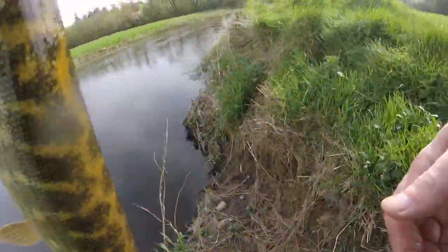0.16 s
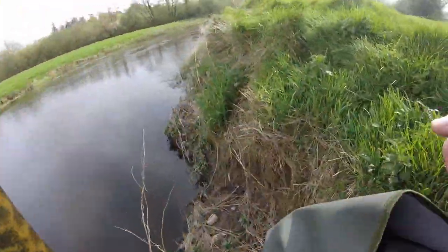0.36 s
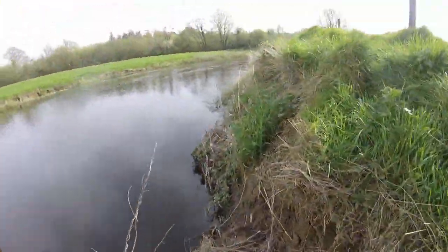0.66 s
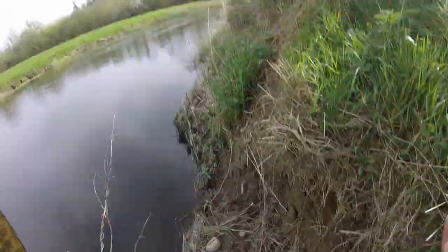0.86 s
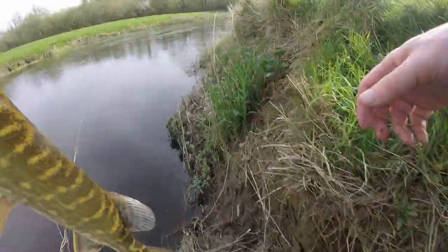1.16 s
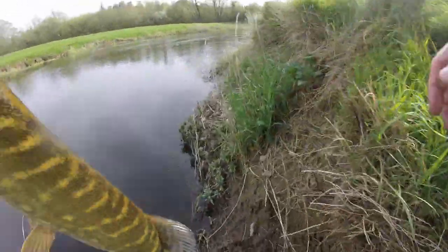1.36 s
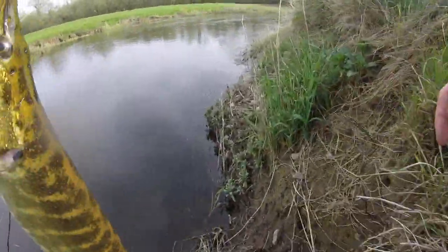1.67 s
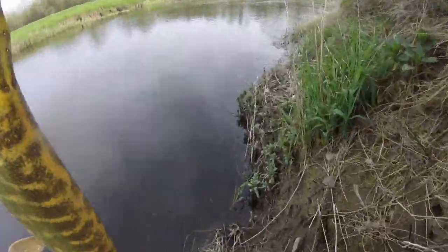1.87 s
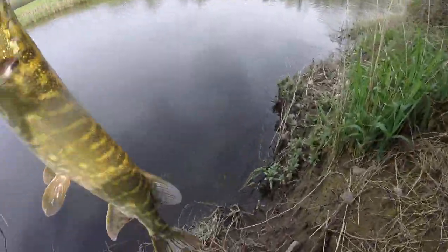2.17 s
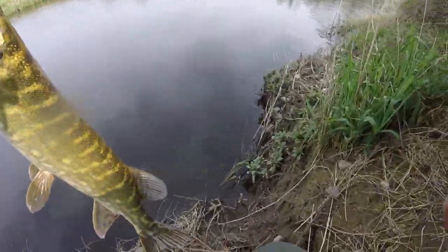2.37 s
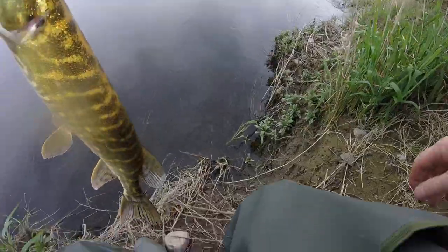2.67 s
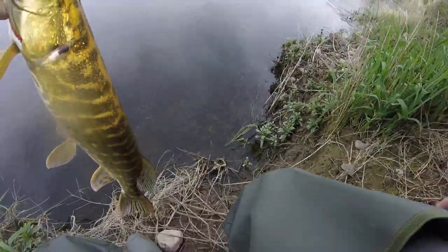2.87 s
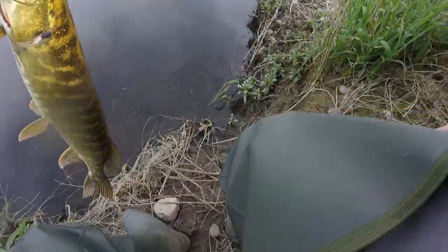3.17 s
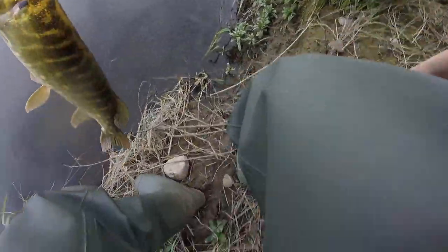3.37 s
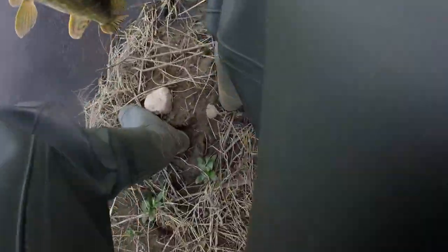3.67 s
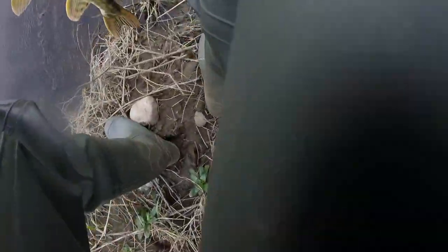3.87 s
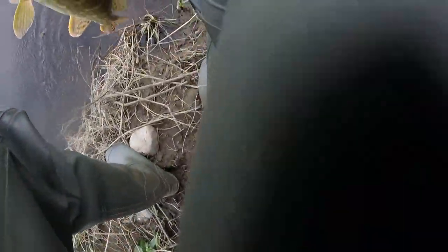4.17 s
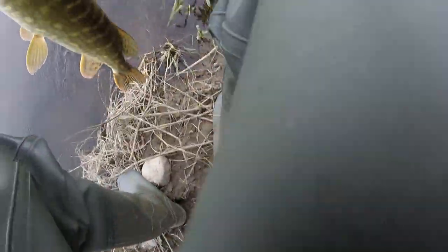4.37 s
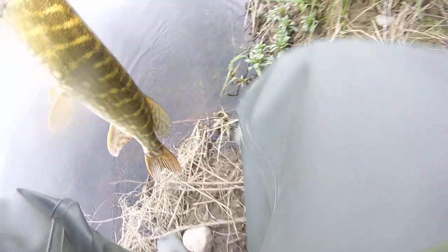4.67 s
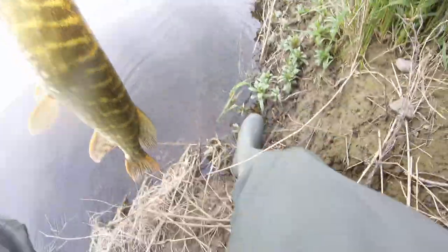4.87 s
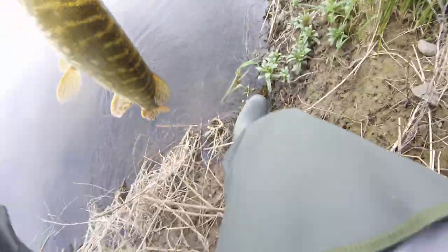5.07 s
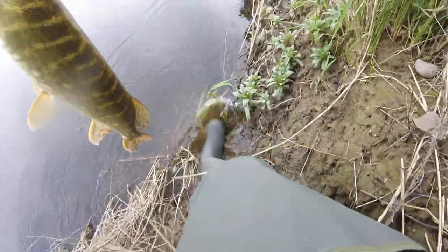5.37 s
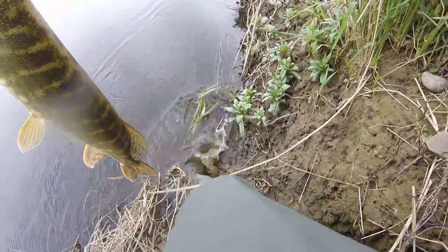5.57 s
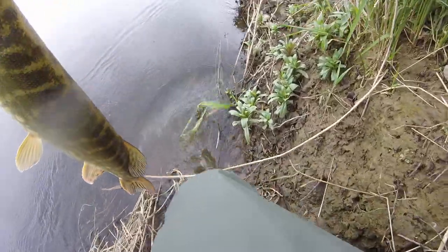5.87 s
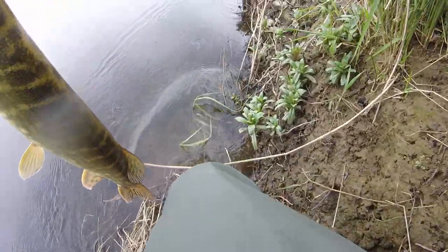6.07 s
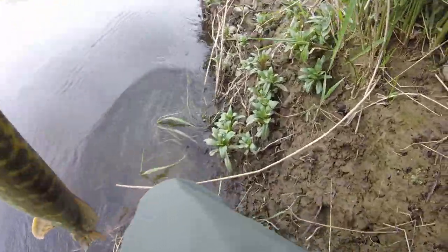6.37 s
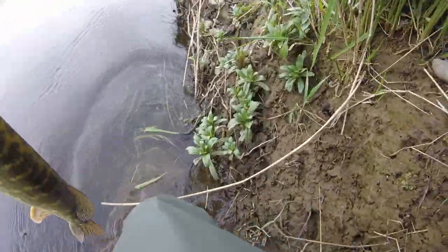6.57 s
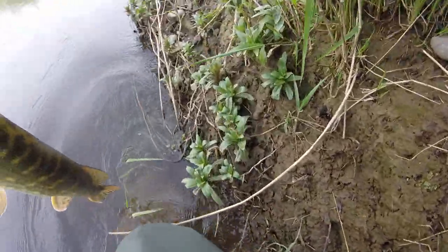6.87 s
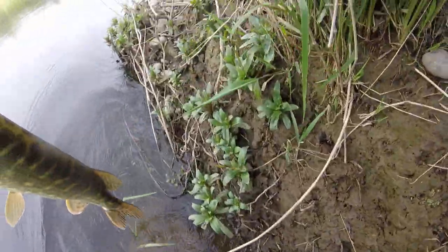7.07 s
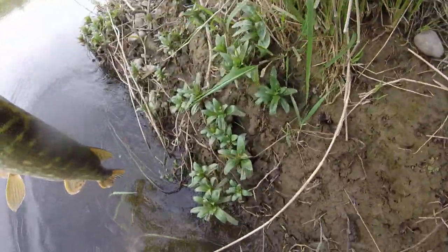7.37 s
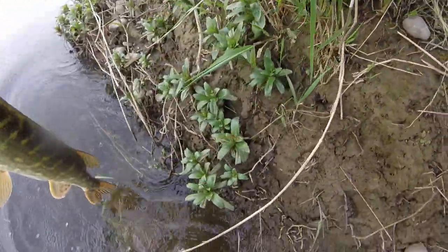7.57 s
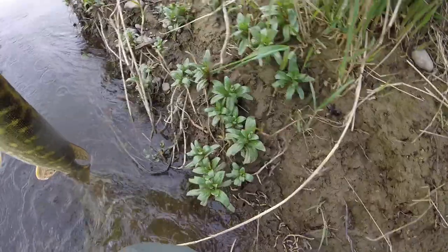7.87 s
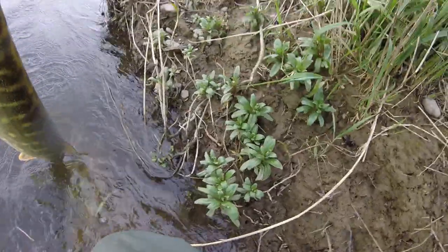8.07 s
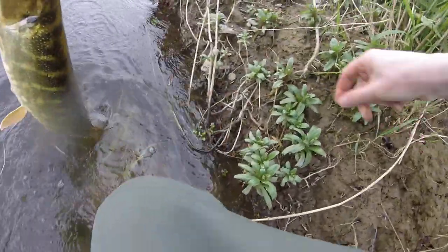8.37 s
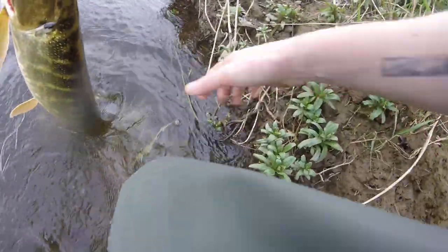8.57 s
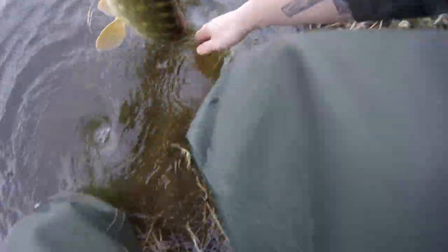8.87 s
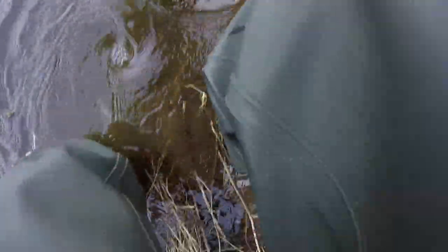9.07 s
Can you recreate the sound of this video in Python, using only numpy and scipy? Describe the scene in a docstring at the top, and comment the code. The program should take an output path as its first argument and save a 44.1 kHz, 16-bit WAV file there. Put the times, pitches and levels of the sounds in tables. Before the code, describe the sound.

Outdoors by a quiet river, a microphone in a plastic case on the chest picks up dry, close contacts. From 0 to 3 s, irregular hard clicks, padded clothing bumps and short rubber rasps come thickly, with dull low jolts near 1.0 and 1.7 s and brief metallic rings; strong clicks land around 2.1-2.2 s. Quick skipping rattles crack at 3.35 and 3.5 s, then a thinner scrape and scattered knocks. A firmer rub with hiss starts around 4.4 s, with rattling at 4.6 s and sharp clicks at 5.0 and 5.3 s. From 5.5 to 7.7 s it is sparse: faint ticks, soft bumps, small rising water drips. Clicks return at 8.0 s, rubbing follows, and the loudest clack hits at 8.63 s with a faint metal tail. Low rustling fades on, with bumps near 9.2 s. A very faint wavering low hum comes and goes in the first seven seconds.

```python
"""Wading down a riverbank, camera on chest

An angler in rubber waders climbs down with a fish in hand, the microphone in a camera strapped to the chest.
Closest are clicks of hard gear and padded bumps of clothing: short contacts that ring the case's resonances.
Firm blows add decaying metal tones, jolts a low sway; the waders rub in strokes of stick-slip noise.
Further off, the fish drips into the river as short rising tones, a wavering low hum comes and goes,
and quiet shaped noise stands for the open air."""
import sys
import numpy as np
from scipy import signal
from scipy.fft import rfft, irfft, next_fast_len
from scipy.io import wavfile
from scipy.ndimage import uniform_filter1d, map_coordinates

SR = 44100
rng = np.random.default_rng(int(sys.argv[2]) if len(sys.argv) > 2 else 0)


def waveform_to_disk(signal):
    """Save audio, clipped to [-1, 1], as 16-bit WAV at the path in sys.argv[1]."""
    frames = np.transpose(np.atleast_2d(signal))
    scaled = np.clip(frames, -1, 1) * 32767
    samples = np.round(scaled).astype(np.int16)
    wavfile.write(sys.argv[1], SR, samples)


N = 407043  # length in samples

# Spectrum of the open air by the river: pitch_hz, level_db (per Hz, relative)
AIR_SPECTRUM = [(15, -34), (25, -15.5), (108, -10.5), (200, -25), (256, -33.5), (463, -31), (2000, -28.5),
                (5000, -34), (8360, -39), (16000, -71)]
# Swells of the low hum: start_s, length_s, level_db
HUM_SWELLS = [(0, .11, -31), (0.21, 0.29, -41.5), (0.83, 0.76, -43.5), (2.67, 0.11, -30.5),
              (5.257, 1.32, -48.5)]
HUM_HZ, HUM_ATTACK_S, HUM_RELEASE_S = 254, 0.051, 0.042
# Water dripping off the fish: start_s, pitch_hz (at the start), level_db
DRIPS = [(5.545, 2360, -32.5), (6.14, 2520, -30), (6.471, 2100, -31.5), (6.593, 2370, -32.5),
         (7.25, 2080, -29.5), (7.432, 3600, -43), (7.561, 2040, -24.5), (7.626, 3440, -41)]

# Strokes of rubber and cloth: start_s, length_s, rasp_db (before a trim), rumble_db (relative to the rasp)
STROKES = [(0, 0.055, -36.5, -5), (0.326, 0.08, -30, -9), (0.768, 0.11, -35, 9.5), (0.912, 0.074, -27, 7.5),
           (0.99, 0.062, -38.5, 11.5), (1.377, 0.012, -34, -19), (1.495, 0.21, -32.5, 2.5),
           (1.798, 0.013, -29, -10.5), (1.997, 0.17, -36.5, 5.5), (2.093, 0.0095, -28, 3),
           (2.464, 0.048, -39.5, 9), (2.562, 0.14, -32.5, 4), (2.85, 0.086, -40, 13.5),
           (3.55, 0.12, -34.5, -20), (3.802, 0.016, -32, -10), (4.081, 0.47, -45.5, -21.5),
           (4.429, .33, -32.5, -6), (4.568, 0.15, -32, -7.5), (4.89, 0.13, -43.5, 4.5),
           (5.212, 0.13, -44, 5.5), (6.336, 0.069, -43, 6), (6.887, 0.066, -45, 10), (7.384, 0.076, -40, 6),
           (8.203, .05, -35.5, 4.5), (8.26, 0.099, -34.5, -0.5), (8.408, 0.073, -38, 1.5),
           (8.59, 0.29, -39.5, 0.5), (8.903, 0.4, -49, 5.5)]
ATTACK_S, RELEASE_S = 0.018, 0.023  # a stroke takes hold, then dies away
HISS_GROWS = 0.15  # extra dB of hiss for each dB of a stroke above the usual
USUAL_STROKE_DB = -37
# Clothing that never quite rests: time_s, rasp_db, rumble_db, hiss_db (rasp and hiss before their trims)
STIR = [(0, -47, -39.5, -65.5), (.45, -42.5, -37.5, -53), (.6, -53, -36, -59), (1.2, -48.5, -36, -59),
        (2.7, -51, -37, -57), (3.3, -54, -39.5, -58.5), (3.7, -46, -43.5, -62), (4.4, -51, -48.5, -62),
        (5.15, -46.5, -35.5, -72.5), (5.45, -65.5, -55, -78), (6.1, -53, -47.5, -57.5),
        (6.6, -53, -42.5, -62.5), (7.7, -55.5, -45, -54), (8.1, -50, -39.5, -62), (8.75, -47.5, -43, -62),
        (9.2, -52.5, -34.5, -65)]
# Place being rubbed: time_s, favoured_hz, sharpness_db (per octave), jerkiness_db (per unit of wobble),
# hiss_db (relative to the rasp, before the trims)
RUBBED_PLACE = [(0, 2360, 2.5, 3, -12), (3.2, 2280, -2, 5, -19.5), (3.55, 1850, 24, 2, -19),
                (4.7, 2040, 19, 3.5, -7), (5.4, 1300, 2.5, 5, -25), (7.85, 1213, 6, 3, -17),
                (8.15, 2430, 11.5, 5, -24), (9.2, 2300, 10, 6.5, -19)]
# Case resonances under rubbing: pitch_hz, width_hz (doubled in rasp()), level_db (before width and place weigh in)
RUBBED_MODES = [(700, 120, -10.5), (1226, 340, -2), (1550, 240, -7), (1929, 160, -1.5), (2240, 110, -0.5),
                (2780, 326, -5), (4120, 100, -36)]
# Spectra of the strap's rumble and the rubbing hiss: pitch_hz, level_db (per Hz, relative)
RUMBLE_SPECTRUM = [(20, -0.5), (45, -11.5), (90, 1.5), (150, -1), (210, -6.5), (310, -2), (380, -14.5),
                   (550, -19), (800, -20), (1200, -32), (3000, -98)]
HISS_SPECTRUM = [(2500, -36), (3600, 5), (4200, 1.5), (4600, -12.5), (5200, -4.5), (5700, 1.5), (6600, -7),
                 (8200, -9), (10000, -13.5), (13000, -19), (15000, -19.5)]

# Dull jolts of the body: start_s, pitch_hz, level_db
THUDS = [(1.025, 113, -7), (1.683, 112, -11), (2.039, 110, -17), (4.566, 78.4, -16.5)]
# Blows that ring the metal part: start_s, level_db
METAL_BLOWS = [(1.115, -42), (1.342, -46), (1.658, -45), (3.35, -35), (3.507, -30.5), (4.083, -36),
               (5.014, -36.5), (8.022, -37), (8.629, -28)]
# Tones of the metal part: pitch_hz, level_db (relative to the blow), t60_s
METAL_TONES = [(1860, 0.5, 0.38), (2400, -4.5, 0.2), (2780, -23, .2)]
# Loose gear that rings briefly: start_s, pitch_hz, level_db, t60_s
TINKLES = [(.99, 4970, -32, 0.15), (1.226, 5000, -39, 0.075), (1.424, 807, -19, 0.043),
           (1.812, 5770, -34, 0.038)]

# Resonances of the camera's mount, then of the case's walls, shell and stiff edges:
# pitch_hz, width_hz, level_db (within each group, before random variation)
MOUNT_MODES = [(112, 72, 0), (192, 73, 3.5), (295, 119, 3.5)]
WALL_MODES = [(721, 100, -2), (1170, 197, 1), (1477, 170, 3)]
SHELL_MODES = [(1882, 218, 8), (2310, 237, 4), (2817, 354, 5), (2990, 280, -1.5)]
EDGE_MODES = [(3910, 280, -2.5), (4157, 99, 5), (5045, 420, -7.5), (5274, 340, -0.5), (5670, 1350, 0.5),
              (7830, 1190, -4), (8250, 790, -6), (9680, 680, -21.5), (11900, 4500, -24.5)]
SOFT_CRACK_DB, HARD_CRACK_DB = -32, 1.5  # crack of the edges at hardness 0 and 1, relative to the shell

# Padded blows of clothing and straps: start_s, level_db, hardness (0-1), thump_db (relative to the shell)
BUMPS = [(0.37, -20, 0.57, 1.5), (0.5049, -38.5, 0.36, 12.5), (0.6514, -38.5, 0.57, 8),
         (0.7898, -37.5, 0.64, 14.5), (0.9089, -20, 0.64, 0.5), (0.97, -21, 0.5, 3), (.984, -20, 0.64, -13),
         (1.0517, -25, 0.5, 7), (1.0674, -25.5, 0.47, 8), (1.0811, -22, .45, 6), (1.5118, -22, 0.6, -0.5),
         (1.5797, -27, 0.7, -0.5), (1.6063, -23, 0.36, 8.5), (1.789, -31, 0.8, 6),
         (1.9872, -20.5, 0.5, -9.5), (2.0085, -27.5, 0.3, 3), (2.157, -26, .25, 4.5),
         (2.3177, -27.5, .55, -3), (2.4448, -23.5, .55, 4), (2.6124, -16.5, 0.41, -7),
         (2.6477, -20.5, 0.4, 6), (2.6994, -34, 0.2, 11.5), (2.8835, -21.5, .25, -5), (2.8976, -29, 0, 11),
         (4.587, -31.5, 0.89, 2.5), (4.8279, -16.5, .25, -8.5), (4.8764, -27, 0.62, -2),
         (4.915, -22.5, 0.2, 5.5), (6.3595, -29, 0.2, 9.5), (6.6782, -35, 0.46, 11.5),
         (6.9017, -34, 0.53, 9), (6.9319, -27.5, 0.26, 8), (7.38, -25, 0.28, 6), (7.3935, -37, 0.66, 14.5),
         (7.4117, -25.5, 0.36, -1), (7.649, -45, 0.52, 19.5), (7.8424, -45, 0.64, 15),
         (8.4168, -29.5, 0.55, 9), (8.446, -31.5, 0.3, 1), (9.1664, -25, 0.5, -9),
         (9.1935, -30.5, 0.46, 5.5)]
PAD_CONTACT_S = 0.0043  # decay time of a padded contact
PAD_KNOCK_DB, KNOCK_PER_THUMP = -1.5, 0.56  # heavier blows knock the wall more

# Hard gear on the case: start_s, level_db, hardness (0-1), knock_db (wall, relative to the shell)
CLICKS = [(.135, -32, 0.26, -6), (.204, -52.5, 1, 1), (.322, -14.5, 0.32, -12), (1.1151, -17.5, 0.91, -8.5),
          (1.2094, -24.5, 0.44, -6.5), (1.2264, -19, 0.14, -10), (1.252, -28, 0.79, -12),
          (1.421, -22.5, 0.17, -21), (1.6572, -15.5, 0.43, -16), (1.6757, -31, .6, -11.5),
          (1.7671, -13, 0.59, -17), (1.8, -25, 0.4, -9), (2.0615, -15, 0.47, -13.5),
          (2.1057, -9, 0.44, -12.5), (2.217, -9, 0.54, -37), (2.473, -20.5, 0.39, -6),
          (2.81, -29.5, 0.28, -4), (3.239, -43, .3, 3), (3.4334, -30, 0.25, -8),
          (3.6394, -21.5, 0.27, -2.5), (3.825, -34, .4, 3), (3.8533, -30.5, 0.28, -7),
          (3.9478, -18, 0.39, -2), (4.0798, -14.5, 0.01, -10.5), (4.781, -29, 0.32, -4),
          (4.7936, -36.5, 0.3, 8), (5.239, -28.5, 0.39, -30), (5.287, -16, 0.82, -27),
          (5.6477, -42, 0.52, -1.5), (5.849, -33.5, 0.58, 5), (5.9548, -45.5, 0.55, 5),
          (6.0374, -50.5, 0.73, 6.5), (6.1384, -31.5, .3, -3), (6.198, -38, 0.59, 2.5),
          (6.858, -40.5, 0.68, 5), (7.1979, -47.5, 1, 9), (7.3126, -43.5, 0.38, 8),
          (7.558, -30.5, 0.2, -6.5), (7.9848, -19, 0.44, -11), (8.025, -15, 0.46, -11),
          (8.1846, -26, 0.55, -24), (8.365, -32.5, 0.53, -8), (8.6297, -0.5, 0.55, -14.5),
          (8.8495, -34.5, 0.76, 2.5), (8.9598, -31, 0.38, -7.5), (8.995, -21.5, 0.28, -20)]
# Gear that catches and skips in a quick run: start_s, level_db, hardness (0-1), knock_db (relative to the shell),
# gap_s, loss_db (at the first skip), contacts (count)
SKIPS = [(1.342, -14.5, 0.32, -12.5, .021, 9.5, 3), (2.9617, -16, 0.45, -8, 0.018, 9.5, 3),
         (3.3538, -7.5, 0.54, -22.5, .011, 17.5, 2), (3.5071, -6.5, 0.64, -21, .0117, 7, 4),
         (4.6169, -10, 0.61, -23, .0125, 4.5, 5), (5.0165, -10.5, 1, -11, 0.013, 16.5, 2)]
SOFT_CONTACT_S, HARD_CONTACT_S = 0.0075, 0.00078  # decay time of a usual click at hardness 0 and 1
SHORTER_PER_DB = 0.035  # exponential rate: each dB above the usual click shortens its contact
USUAL_CLICK_DB = -23.5

# Treble roll-off of the recorder: pitch_hz, level_db
TREBLE_ROLLOFF = [(8000, 0), (12000, -2), (14500, -8.5), (15300, -18)]
TOP_HZ = 15300  # nothing passes from here up
DUCK_ABOVE_DB, RECOVER_DB_PER_S = -5, 34.5  # the camera's gain control


def amp(db):
    """Amplitude factor for a level in dB."""
    return 10 ** (np.asarray(db) / 20)


def unit(x):
    """x scaled to rms 1."""
    return x / np.sqrt(np.mean(x ** 2) + 1e-20)


def curves(rows):
    """One value per sample for each column after the time."""
    s, *cols = np.transpose(rows)
    return [np.interp(np.arange(N) / SR, s, c) for c in cols]


def wobble(rate):
    """A smooth random curve, rate knots a second."""
    knots = rng.standard_normal(int(N * rate / SR) + 4)
    return map_coordinates(knots, [np.arange(N) * rate / SR])


def filtered(x, response):
    """x filtered by a response given as a function of frequency."""
    m = next_fast_len(len(x) + 2048)
    return irfft(rfft(x, m) * response(np.fft.rfftfreq(m, 1 / SR)), m)[:len(x)]


def coloured(x, points):
    """x shaped by a (Hz, dB) spectrum, at rms 1."""
    f, db = np.transpose(points)
    return unit(filtered(x, lambda hz: amp(np.interp(np.log(hz + 1), np.log(f), db))))


def swell(start, length, attack_s, release_s):
    """Envelope that rises before its start, holds for its length and dies away."""
    t = np.arange(N) / SR - start
    return np.clip(1 + t / attack_s, 0, 1) * np.exp(-np.clip((t - length) / release_s, 0, 20))


def add(track, s, sound):
    """Mix a sound in at time s."""
    part = track[max(round(s * SR), 0):][:len(sound)]
    part += sound[:len(part)]


def place(times, db, sounds):
    """Lay each row of sounds on one track at its time and level."""
    track = np.zeros(N)
    for s, sound in zip(times, amp(db)[:, None] * sounds):
        add(track, s, sound)
    return track


def mode(f, hz, width):
    """Causal response of one resonance."""
    return 1j * f * width / (hz * hz - f * f + 1j * f * width)


def resonate(force, modes, low_hz, high_hz, vary_db, tilt=0):
    """Each row of force rings the modes at new strengths, tilted in dB per octave; scaled to rms 1 over 10 ms."""
    size = force.shape[1]
    f = np.fft.rfftfreq(size, 1 / SR)
    # neighbouring modes alternate in sign
    shapes = np.array([(-1) ** k * amp(db) * mode(f, hz, width) for k, (hz, width, db) in enumerate(modes)])
    octaves = np.log2(np.transpose(modes)[0])
    strengths = vary_db * rng.standard_normal((len(force), len(modes))) + np.outer(tilt, octaves)
    ringing = irfft(rfft(force) * (amp(strengths) @ shapes), size)
    band = signal.butter(2, [low_hz, min(high_hz, SR / 2 - 1)], "bandpass", fs=SR, output="sos")
    out = signal.sosfilt(band, ringing)
    return out / np.linalg.norm(out, axis=1, keepdims=True) * np.sqrt(SR / 100)


def contacts(lengths, scrape, chatter_db, chatter_s):
    """Force of each contact: a snap, a gritty scrape of its own length, then faint chatter."""
    t = np.arange(4096) / SR
    noise = rng.standard_normal((len(lengths), len(t)))
    grit = noise * np.abs(noise)
    scrape_decay = np.exp(-t / np.maximum(lengths, 1e-4)[:, None])
    chatter_decay = amp(chatter_db) * np.exp(-t / chatter_s)
    force = scrape * grit * (scrape_decay + chatter_decay)
    force[:, 0] += 1  # the snap
    return force


def crack(hardness):
    """Harder contacts crack more: level of the case's edges in dB."""
    return SOFT_CRACK_DB + (HARD_CRACK_DB - SOFT_CRACK_DB) * hardness


def case(force, knock_db, crack_db):
    """The plastic case answers with its shell, its walls and its stiff edges."""
    # a soft contact has more knock than crack and favours the lower modes
    brightness_db = crack_db - knock_db + 13.0
    shell_tilt = np.minimum(0.52 * brightness_db, 2)
    shell = resonate(force, SHELL_MODES, low_hz=1500, high_hz=3740, vary_db=5.5, tilt=shell_tilt)
    wall = resonate(force, WALL_MODES, low_hz=400, high_hz=1700, vary_db=2.5)
    # only the start of a contact is sharp enough to crack
    first_bite = force * np.exp(-np.arange(force.shape[1]) / SR / 0.012)
    edge_tilt = 0.42 * (crack_db + 9.5)
    edge = resonate(first_bite, EDGE_MODES, low_hz=3460, high_hz=13600, vary_db=3.5, tilt=edge_tilt)
    return shell + amp(knock_db)[:, None] * wall + amp(crack_db)[:, None] * edge


def air():
    """Quiet open air by the river: steady noise with a soft, mostly low spectrum."""
    return amp(-64.0) * coloured(rng.standard_normal(N), AIR_SPECTRUM)


def hum():
    """A low hum: one sine that comes in swells and wavers in pitch and strength."""
    level = sum(amp(db) * swell(s, length, HUM_ATTACK_S, HUM_RELEASE_S) for s, length, db in HUM_SWELLS)
    phase = 2 * np.pi * np.cumsum(HUM_HZ + 1.81 * wobble(10)) / SR
    return level * amp(2.0 * wobble(9.2)) * np.sqrt(2) * np.sin(phase)


def drips():
    """Each drop traps a bubble whose pitch rises as it dies."""
    track, t = np.zeros(N), np.arange(SR // 10) / SR
    for s, hz, db in DRIPS:
        envelope = amp(db - 60 * t / 0.03) * (1 - np.exp(-t / 0.000094))
        add(track, s, envelope * np.sin(2 * np.pi * hz * t * (1 + 0.67 * t)))
    return track


def sliding():
    """Strengths of rasp, rumble and hiss: strokes on an unbroken stir whose strength drifts; firmer ones hiss more."""
    stir_db, stir_rumble_db, stir_hiss_db = curves(STIR)
    place_hiss_db = curves(RUBBED_PLACE)[-1]
    start, length, db, rumble_db = np.transpose(STROKES)
    power_shapes = np.array([swell(s, held, ATTACK_S, RELEASE_S) for s, held in zip(start, length)]) ** 2

    def strokes(levels_db):
        """Joint amplitude of the strokes, their powers added."""
        return np.sqrt(amp(levels_db) ** 2 @ power_shapes)

    stroke_hiss = amp(place_hiss_db) * strokes(db + HISS_GROWS * (db - USUAL_STROKE_DB))
    rub = np.hypot(amp(stir_db), strokes(db))
    weight = np.hypot(amp(stir_rumble_db), strokes(db + rumble_db))
    hiss = np.hypot(amp(stir_hiss_db), stroke_hiss)
    return rub, weight, hiss


def friction(jerks):
    """Stick and slip: tiny releases of uneven size over a smooth slide."""
    releases = (rng.random(N) < 500 / SR) * rng.standard_normal(N)  # 500 a second on average
    return jerks * (unit(releases) + 1.3 * rng.standard_normal(N))


def rasp(jerks, favoured_hz, sharpness):
    """Sliding rings each resonance of the case; a place can favour those near one pitch or hold them back."""
    weights, rings = [], []
    for hz, width, db in RUBBED_MODES:
        octaves_away = np.abs(np.log2(hz / favoured_hz))
        weights.append(amp(db - sharpness * octaves_away) * np.sqrt(width))
        rings.append(unit(filtered(friction(jerks), lambda f: mode(f, hz, 2.0 * width) ** 2)))
    weights = np.array(weights)
    return np.sum(weights * np.array(rings), axis=0) / np.linalg.norm(weights, axis=0)


def waders(rub, weight, hiss):
    """Rubber and cloth slide in jerks, rasping on the case and rumbling through the strap."""
    favoured_hz, sharpness, jerk_db, _ = curves(RUBBED_PLACE)
    jerks = amp(jerk_db * (wobble(45) + 0.87 * wobble(160)))
    rumble = coloured(rng.standard_normal(N) * amp(5.38 * wobble(28)), RUMBLE_SPECTRUM)
    fizz = coloured(friction(np.sqrt(jerks)), HISS_SPECTRUM)
    scraping = rasp(jerks, favoured_hz, sharpness)
    return weight * rumble + amp(-0.5) * rub * scraping + amp(-8.5) * hiss * fizz


def crackle(rub):
    """Small random crackle of the rubbing: short ticks on the case whose level follows the sliding."""
    when, loudness, softness = rng.random((110, 3)).T
    s = when * N / SR
    db = 20 * np.log10(rub[(s * SR).astype(int)]) - 5 + 10 * loudness
    force = contacts(0.0043 * softness, scrape=0.25, chatter_db=-30, chatter_s=0.0038)
    sounds = case(force, knock_db=-11.5 + 20.2 * softness, crack_db=-13 - 2.8 * softness)
    return place(s, db, sounds)


def thuds():
    """A jolt sways the mount: a low sine that dies within a few cycles."""
    track, t = np.zeros(N), np.arange(SR // 8) / SR
    for s, hz, db in THUDS:
        add(track, s, amp(db - 60 * t / 0.067) * np.sin(2 * np.pi * hz * t))
    return track


def metal():
    """A metal part sings on faintly after firm blows; loose gear adds short rings, all decaying sines."""
    track, t = np.zeros(N), np.arange(SR // 2) / SR
    for s, db in METAL_BLOWS:
        for hz, level, t60 in METAL_TONES:
            add(track, s, amp(db + level - 60 * t / t60) * np.sin(2 * np.pi * hz * t))
    for s, hz, db, t60 in TINKLES:
        add(track, s, amp(db - 60 * t / t60) * np.sin(2 * np.pi * hz * t))
    return track


def bumps():
    """Padded blows of clothing scrape over the case and also shake the whole mount."""
    s, db, hardness, thump_db = np.transpose(BUMPS)
    lengths = np.full(len(s), PAD_CONTACT_S)
    force = contacts(lengths, scrape=0.66, chatter_db=-23.5, chatter_s=0.0039)
    push = contacts(lengths, scrape=0.041, chatter_db=-8.5, chatter_s=0.0096)
    shake = resonate(push, MOUNT_MODES, low_hz=55.9, high_hz=382, vary_db=5.0)
    knock_db = PAD_KNOCK_DB + KNOCK_PER_THUMP * thump_db
    return place(s, db, case(force, knock_db, crack(hardness)) + amp(thump_db)[:, None] * shake)


def clicks():
    """Hard gear snaps on the case, singly or in fading runs; harder is shorter, and some knock shakes the mount."""
    hits = list(CLICKS)
    for s, db, hardness, knock, gap, loss, count in SKIPS:
        hits += [(s + k * gap, db - loss * np.sqrt(k), hardness, knock) for k in range(round(count))]
    s, db, hardness, knock_db = np.transpose(hits)
    lengths = SOFT_CONTACT_S * (HARD_CONTACT_S / SOFT_CONTACT_S) ** hardness
    lengths = lengths * np.exp(-SHORTER_PER_DB * (db - USUAL_CLICK_DB))
    force = contacts(lengths, scrape=0.21, chatter_db=-23, chatter_s=0.0058)
    shake = resonate(force, MOUNT_MODES, low_hz=70, high_hz=340, vary_db=2.5)
    sounds = case(force, knock_db, crack(hardness)) + amp(knock_db - 13.5)[:, None] * shake
    return place(s, db, sounds)


def scene():
    """Everything that reaches the chest, from the open air to the gear on the case."""
    rub, weight, hiss = sliding()
    background = air() + hum() + drips()
    rubbing = waders(rub, weight, hiss) + crackle(rub)
    blows = thuds() + metal() + bumps() + clicks()
    return (background + rubbing + blows)[None]


def gain_control(x):
    """The gain drops at once under a loud sound and creeps back at a steady rate in dB."""
    power = np.abs(uniform_filter1d(x ** 2, size=SR // 1000))  # averaged over 1 ms
    level_db = 10 * np.log10(power + 1e-12)
    recovery = RECOVER_DB_PER_S * np.arange(N) / SR
    # the deepest cut so far, less what has been recovered since
    cut_db = np.maximum.accumulate(np.maximum(level_db - DUCK_ABOVE_DB, 0) + recovery) - recovery
    return x * amp(-cut_db)


def record(dry):
    """The loudest sounds duck the gain and flatten near full scale; the top treble is dulled and cut off."""
    ducked = gain_control(dry[0])
    held = ducked / (1 + np.abs(ducked / 0.98) ** 6) ** (1 / 6)
    rolloff_hz, rolloff_db = np.transpose(TREBLE_ROLLOFF)
    return filtered(held, lambda hz: amp(np.interp(hz, rolloff_hz, rolloff_db)) * (hz < TOP_HZ))[None]


dry = scene()
out = record(dry)
waveform_to_disk(out)
```